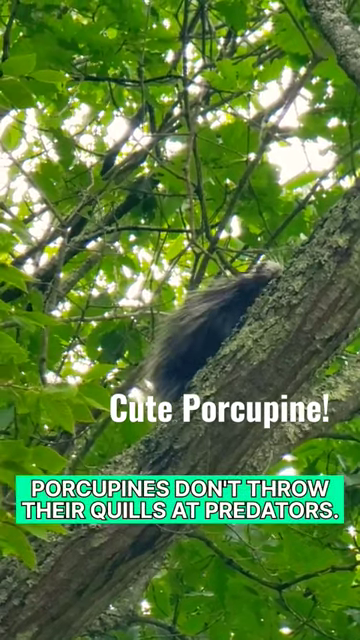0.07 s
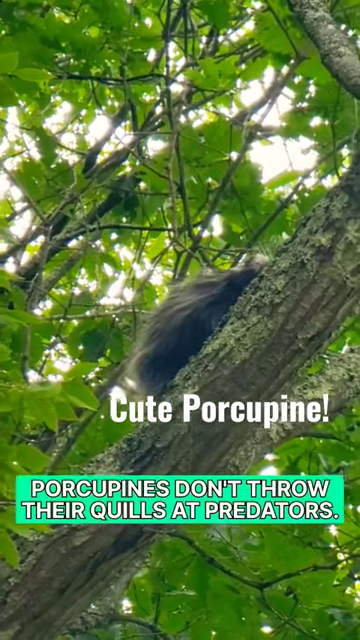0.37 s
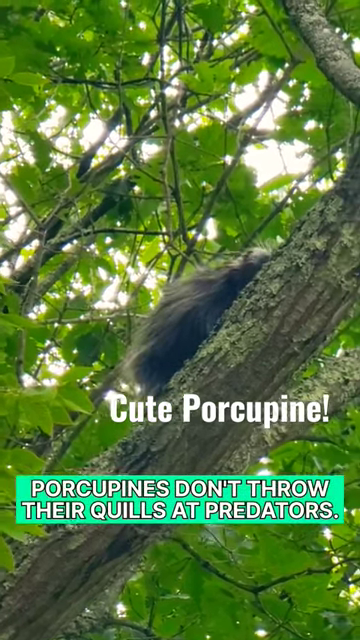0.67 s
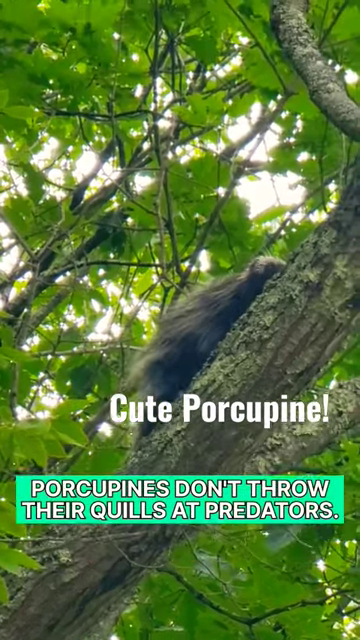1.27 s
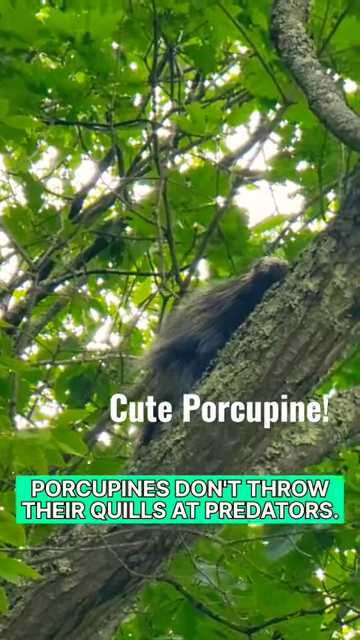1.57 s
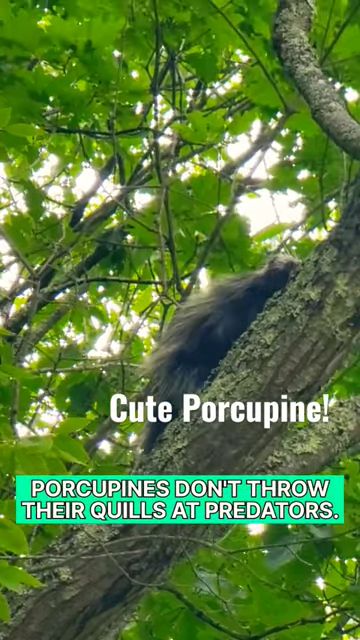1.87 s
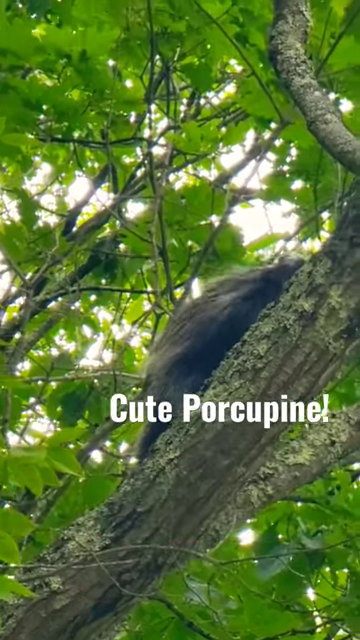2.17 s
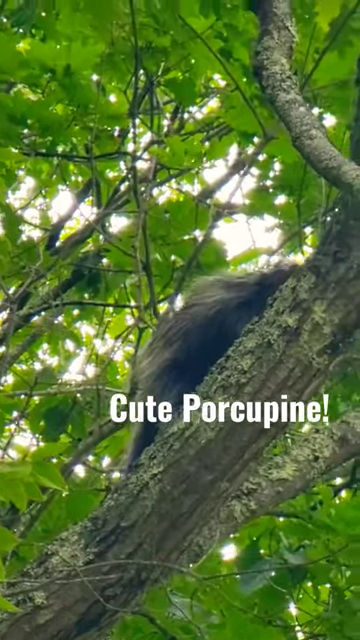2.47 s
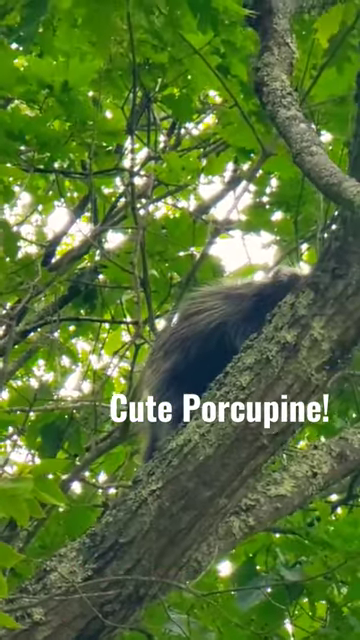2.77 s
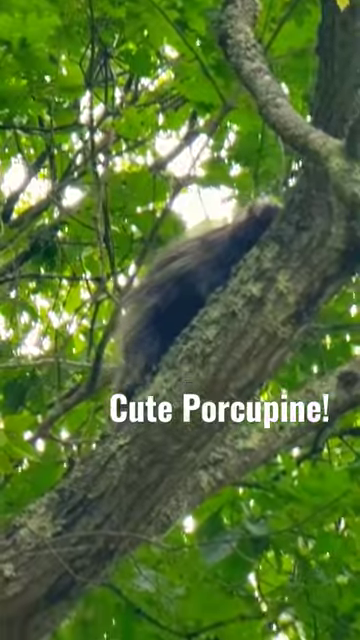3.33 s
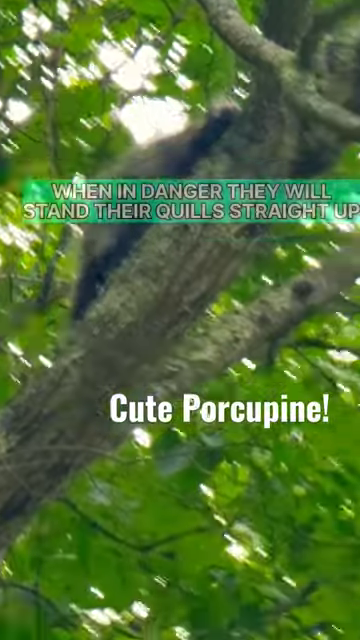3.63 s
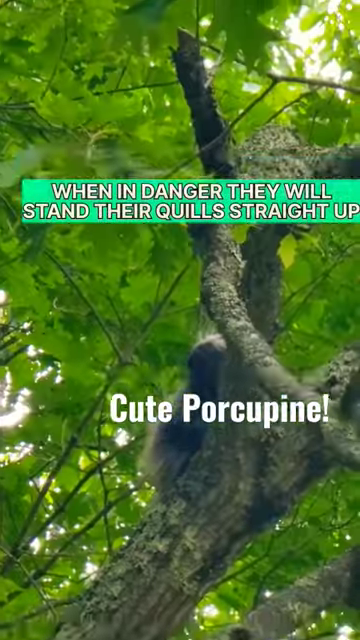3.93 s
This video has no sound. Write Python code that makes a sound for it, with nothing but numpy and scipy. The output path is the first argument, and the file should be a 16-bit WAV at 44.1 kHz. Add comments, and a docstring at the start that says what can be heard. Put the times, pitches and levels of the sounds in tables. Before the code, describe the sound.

Birds sing in the woods, opening with a short falling whistle. From about 0.4 seconds a rapid, high trill swells, stopping at 1.7. A second sliding whistled phrase comes around 2 seconds, then a faint, far whistle dips and rises from 2.5 to 3.8, and a short peep ends it. A distant engine drones underneath throughout, with soft rustles and tiny twig ticks near 1 and 3.7 seconds.

```python
"""Summer woods. A distant engine drones under the hush of the air, with soft rustles and far bird calls.
A bird whistles a sliding phrase, then another swells into a dry trill of quick upward chips, and a
twig ticks. After the trill comes a second whistled phrase, then one long, far whistle that dips and
rises. Another tick and a short peep come last. The trees scatter the birdsong into soft echoes."""
import sys
import numpy as np
from scipy import signal
from scipy.fft import rfft, irfft
from scipy.io import wavfile

SR = 44100
rng = np.random.default_rng(int(sys.argv[2]) if len(sys.argv) > 2 else 0)


def store_wav(level_fs):
    """Save 16-bit WAV to argv[1]."""
    pcm = np.round(np.clip(np.atleast_2d(level_fs), -1, 1) * 32767)
    wavfile.write(sys.argv[1], SR, pcm.T.astype(np.int16))


N = 176400
TIME = np.arange(N) / SR
FAR_FADE_S = 0.72  # time for a far bird's echo to fall by 60 dB


def from_db(db):
    """Turn decibels into a number to multiply by."""
    return 10 ** (np.asarray(db) / 20)


def unit_power(x):
    """Scale a signal so that its average power is 1."""
    return x / np.sqrt(np.mean(x ** 2) + 1e-20)


def in_time(rows):
    """Join rows that start with a time into curves, one for each other column."""
    times, *columns = np.transpose(rows)
    return [np.interp(TIME, times, column) for column in columns]


def at_hz(points, hz):
    """Read a value between frequency points, with every octave equally wide."""
    frequencies, values = np.transpose(points)
    return np.interp(np.log(hz), np.log(frequencies), values)


def drift(rate_hz):
    """A smooth random wobble of size about 1; a higher rate wobbles faster."""
    step, warm_up = 40, 2000
    memory = np.exp(-2 * np.pi * step * rate_hz / SR)
    noise = rng.standard_normal(N // step + warm_up + 2)
    slow = signal.lfilter([1], [1, -2 * memory, memory * memory], noise)[warm_up:]
    return np.interp(np.arange(N) / step, np.arange(len(slow)), unit_power(slow))


def phase_of(hz):
    """The angle a wave has turned through as its pitch moves."""
    return 2 * np.pi * np.cumsum(hz) / SR


def pan(left_db):
    """Left and right gains that make the left ear louder by left_db."""
    return from_db(np.array([[left_db], [-left_db]]) / 2)


def place(x, left_db, lag_ms):
    """Put a sound to one side: the ears differ in level, and the left hears it later."""
    hz = np.arange(N // 2 + 1) * SR / N
    late = irfft(rfft(x) * np.exp(-2j * np.pi * hz * lag_ms / 1000), N)
    return np.array([late, x]) * pan(left_db)


def woods(x, echo_db, fade_s):
    """Echoes from near branches and far trunks, different in each ear; far ones fall 60 dB in fade_s."""
    near_share, near_fade_s, build_s = 0.64, 0.058, 0.0079
    t = TIME[:SR]
    far = unit_power(from_db(-60 * t / fade_s))
    near = unit_power(from_db(-60 * t / near_fade_s))
    shape = np.sqrt((1 - near_share) * far ** 2 + near_share * near ** 2) * (1 - np.exp(-t / build_s))
    echoes = unit_power(rng.standard_normal((2, SR)) * shape) / np.sqrt(SR)
    return from_db(echo_db) * signal.fftconvolve(x[None], echoes, axes=1)[:, :N]


def twigs(x, echo_db=-11, peak_s=0.0028):
    """Twigs around a perch bounce a note back a few milliseconds late, which thickens it."""
    t = TIME[:SR // 20]
    echoes = unit_power(rng.standard_normal((2, len(t))) * t * np.exp(-t / peak_s)) / np.sqrt(len(t))
    return from_db(echo_db) * signal.fftconvolve(x[None], echoes, axes=1)[:, :N]


def banded_noise(spectrum, flicker_db):
    """Stereo noise in bands half an octave wide, each flickering on its own."""
    # how alike the two ears are: frequency_hz, likeness (1 = the same, 0 = unrelated)
    ear_likeness = [(40, 0.96), (130, 0.68), (300, 0.62), (700, 0.38), (1300, -0.18), (3000, 0.073),
                    (10000, 0.00048)]
    out, edges_hz = 0, np.geomspace(22, 17000, 21)
    white = rng.standard_normal((2, 2, N))
    for k, (low, high) in enumerate(zip(edges_hz, edges_hz[1:])):
        band = signal.butter(2, [low, high], "band", fs=SR, output="sos")
        shared, opposite = signal.sosfilt(band, white[k % 2])
        hz = np.sqrt(low * high)
        alike = at_hz(ear_likeness, hz)
        stereo = np.sqrt(1 + alike) * shared + np.sqrt(1 - alike) * opposite * [[1], [-1]]
        out += from_db(at_hz(spectrum, hz) + flicker_db * drift(31)) * stereo
    return unit_power(out)


def air(level_db=-59):
    """A steady low rumble and the hush of the woods."""
    # the tone of still air: frequency_hz, level_db
    spectrum = [(25, 4), (40, 8), (70, 15), (110, 12), (160, 1), (300, -1), (450, -1.5), (750, 0),
                (1100, -3.5), (1600, -12.5), (2100, -18), (2600, -13.5), (4200, -16), (5500, -26.5),
                (7500, -26), (10000, -37.5), (12500, -24), (15500, -24)]
    return from_db(level_db) * banded_noise(spectrum, flicker_db=2) * pan(left_db=-1.4)


def engine(gain_db=-0.56, waver_db=2, firings_per_cycle=8):
    """A far exhaust: the firings make one strong tone, and weaker tones around it make it throb."""
    # the firing tone: time_s, pitch_hz
    pitch_curve = [(0.0, 117.5), (0.56, 117), (0.67, 115.5), (2.47, 115.5), (2.68, 118), (3.35, 115.5),
                   (3.44, 117), (3.91, 116.5), (4.0, 130)]
    # how the drone swells and sinks: time_s, level_db
    level_curve = [(0.0, -52), (0.23, -45.5), (0.26, -53), (0.42, -44.5), (0.48, -53), (0.57, -46),
                   (1.48, -49.5), (1.56, -52.5), (1.59, -47), (2.34, -65.5), (2.94, -51.5), (3.66, -51),
                   (3.92, -55.5), (4.0, -64.5)]
    # the engine's tones: waves_per_cycle, level_db
    tones = [(3, -18), (4, -16.5), (5, -19.5), (6, -19), (7, -16), (8, 0), (9, -14.5), (15, -30.5)]
    (hz,), (db,) = in_time(pitch_curve), in_time(level_curve)
    cycle, swell_db = phase_of(hz / firings_per_cycle), db - db.mean()
    out = 0
    for multiple, tone_db in tones:
        weak = multiple != firings_per_cycle  # weak tones swell less and wander out of step
        level_db = db.mean() + swell_db * (0.79 if weak else 1) + tone_db
        phase = multiple * cycle + rng.uniform(0, 2 * np.pi) + weak * 0.33 * drift(2.95)
        out += np.sqrt(2) * from_db(gain_db + level_db + waver_db * drift(1.35)) * np.sin(phase)
    return place(out, left_db=-2.5, lag_ms=0.25)


def rustles():
    """Something rustles close by in brief swells of soft, bright noise."""
    # each rustle: middle_s, width_s, level_db
    swells = [(0.248, 0.11, -64), (.82, 0.24, -72.5), (2.78, 0.22, -78), (3.47, 0.1, -73.5),
              (3.768, 0.13, -73)]
    # the tone of the rustling: frequency_hz, level_db
    spectrum = [(300, -11), (1500, -59), (2700, 1.5), (5000, 0), (7500, -5.5), (10000, -20), (15000, -8.5)]
    loudness = sum(from_db(db) * np.exp(-((TIME - s) / width) ** 2) for s, width, db in swells)
    return loudness * banded_noise(spectrum, flicker_db=4)


def ticks(decay_s=0.002, band_hz=(5100, 8500), crack_db=-13):
    """Tiny twig snaps: bright noise with a broad crack on top, dying at once."""
    # each snap: start_s, level_db
    snaps = [(1.0592, -55.5), (3.731, -60)]
    bursts = sum(from_db(db) * (TIME >= s) * np.exp(-np.abs(TIME - s) / decay_s) for s, db in snaps)
    band = signal.butter(2, band_hz, "band", fs=SR, output="sos")
    bright = unit_power(signal.sosfilt(band, rng.standard_normal(N)))
    crack = from_db(crack_db) * rng.standard_normal(N)
    sound = bursts * (bright + crack)
    return sound + woods(sound, echo_db=-8, fade_s=0.3)


def far_birds(gain_db=-0.5, buzz_rate_hz=130, uneven=0.35):
    """Short sliding calls, half lost in the trees; a fast, uneven shake in pitch makes them buzz."""
    # each call: start_s, length_s, first_hz, last_hz, level_db, buzz_depth_hz
    calls = [(0, 0.024, 4090, 4220, -66, 64.8), (0.101, 0.033, 4140, 4050, -66, 60),
             (0.107, 0.3, 6740, 7240, -74, 890), (.115, 0.03, 2500, 1990, -61.5, 124),
             (1.348, 0.063, 2200, 1750, -60.5, 79), (1.748, 0.064, 4625, 4606, -55, 118),
             (1.8, 0.054, 3660, 3560, -67, 130), (1.916, 0.058, 4350, 3800, -60.5, 179),
             (1.972, 0.095, 3990, 4575, -63, 356.4), (1.965, .12, 5000, 5090, -68.5, 185),
             (2.05, 0.082, 2976, 2967, -61, 119), (2.158, .16, 7180, 6870, -75.5, 280),
             (2.602, 0.34, 4086, 4395, -72.5, 300), (3.024, 0.038, 4380, 4650, -72.5, 60),
             (3.077, .06, 4850, 4500, -79, 60), (3.365, 0.078, 8360, 8660, -70.5, 830),
             (3.511, 0.049, 4840, 4000, -71, 64.4), (3.924, 0.3, 4057, 4250, -67.5, 54)]
    shake = np.sin(phase_of(buzz_rate_hz * (1 + uneven * drift(40)))) * (1 + uneven * drift(90))
    song = np.zeros(N)
    for start_s, length_s, first_hz, last_hz, db, buzz_depth_hz in calls:
        progress = np.clip((TIME - start_s) / length_s, 0, 1)
        hz = first_hz + (last_hz - first_hz) * progress + buzz_depth_hz * shake
        song += from_db(db + gain_db) * np.sin(np.pi * progress) * np.sin(phase_of(hz))
    return song + woods(song, echo_db=5, fade_s=FAR_FADE_S)


def whistle(curve, quaver_hz=17.5, rasp_hz=60, flutter_db=1, edge_s=0.011):
    """A sliding tone that trembles a little in pitch and level, and rasps where it falls fast."""
    hz, db = in_time(curve)
    falling = np.clip(-np.gradient(hz) * SR / 13000, 0, 1)  # full rasp at a fall of 13000 Hz a second
    hz = hz + quaver_hz * drift(54.7) + rasp_hz * falling * drift(240)
    fade = np.clip(np.minimum(TIME - curve[0][0], curve[-1][0] - TIME) / edge_s, 0, 1)
    return fade * from_db(db + flutter_db * drift(34)) * np.sin(phase_of(hz))


def far_whistler(fading_db=4):
    """A far bird's long note fades in and out, heard only as echoes from the trees."""
    # a note that dips and rises again: time_s, pitch_hz, level_db
    note = [(2.48, 3987, -79), (2.66, 4107, -76), (2.8, 4215, -65.5), (2.9, 4150, -81), (2.97, 3770, -77.5),
            (3.07, 3470, -78.5), (3.15, 3430, -80), (3.21, 3400, -72), (3.31, 3460, -83), (3.48, 3880, -75),
            (3.62, 4010, -78), (3.8, 3930, -84)]
    song = whistle(note, quaver_hz=31.9) * from_db(fading_db * drift(18))
    return woods(song, echo_db=2.5, fade_s=FAR_FADE_S)


def near_whistler(gain_db=0.5):
    """A near bird whistles two sliding phrases; a short, dry peep follows at the end."""
    # one curve for each phrase: time_s, pitch_hz, level_db
    phrases = [
        [(0, 3204, -34), (.012, 3337, -55), (.028, 3370, -48.5), (.037, 3400, -61), (.05, 3418, -48.5),
         (.075, 3443, -49), (.092, 3280, -63), (.11, 3010, -52), (.126, 2842, -53.5), (.134, 2314, -72),
         (.16, 2150, -82), (.21, 2430, -64), (.235, 2450, -56)],
        [(1.935, 3950, -64), (1.962, 3510, -49.5), (1.971, 3280, -68), (1.977, 2976, -55.5), (1.992, 3060, -51),
         (2.046, 3013, -52.5), (2.07, 3058, -65), (2.115, 3133, -56), (2.149, 2880, -54), (2.162, 2490, -57),
         (2.177, 2314, -65), (2.209, 2483, -56), (2.231, 2560, -75), (2.253, 2670, -57.5), (2.275, 2680, -93)],
    ]
    # a peep that rises and falls: time_s, pitch_hz, level_db
    peep_curve = [(3.898, 2780, -58), (3.916, 2940, -54.5), (3.924, 2920, -54), (3.938, 2430, -54)]
    song = from_db(gain_db) * sum(whistle(phrase) for phrase in phrases)
    peep = whistle(peep_curve)
    echoes = twigs(song + peep) + woods(song, echo_db=-3.5, fade_s=0.43)
    return place(song, left_db=0.5, lag_ms=0.08) + peep + echoes


def trill(gain_db=-0.26, quaver_hz=47, jitter_hz=26.6, leaf_cutoff_hz=3950):
    """Each chip is a pure tone that sweeps up, swells and fades; leaves dull its far echo."""
    # each chip of the trill: middle_s, level_db
    chips = [(.364, -69), (.413, -64.5), (0.459, -65.5), (0.505, -62.5), (.552, -59), (0.598, -57.5),
             (.645, -54.5), (.692, -54.5), (.740, -55.5), (.788, -52.5), (0.834, -53.5), (.883, -50),
             (0.932, -57), (.980, -50), (1.026, -49.5), (1.074, -50), (1.121, -49), (1.169, -46),
             (1.217, -49.5), (1.265, -47), (1.313, -47.5), (1.360, -45), (1.41, -48), (1.456, -46),
             (1.508, -45), (1.557, -45.5), (1.606, -46.5), (1.654, -46.5), (1.705, -44)]
    # the centre of the sweeps: time_s, pitch_hz
    pitch_curve = [(.36, 4670), (.65, 4490), (1.15, 4353), (1.7, 4365)]
    # the shape of every chip: from_middle_s, from_centre_hz, level_db
    chip_shape = [(-.017, -950, -28.5), (-.0105, -560, -16.5), (-.0055, -190, -5.5), (0, 29.5, .5),
                  (.004, 161, -4), (.008, 244, -6), (.011, 236, -19), (0.014, 140, -32)]
    shape_s, sweep_hz, swell_db = np.transpose(chip_shape)
    centre_hz = in_time(pitch_curve)[0] + quaver_hz * drift(370)
    song = np.zeros(N)
    for middle_s, db in chips:
        sounding = (TIME > middle_s + shape_s[0]) & (TIME < middle_s + shape_s[-1])
        t = TIME[sounding] - middle_s
        hz = centre_hz[sounding] + jitter_hz * rng.standard_normal() + np.interp(t, shape_s, sweep_hz)
        song[sounding] += from_db(gain_db + db + np.interp(t, shape_s, swell_db)) * np.sin(phase_of(hz))
    dulled = signal.sosfilt(signal.butter(8, leaf_cutoff_hz, fs=SR, output="sos"), song)
    echoes = woods(song, echo_db=-6.3, fade_s=0.66) + woods(dulled, echo_db=8, fade_s=1.0)
    return place(song, left_db=2.5, lag_ms=0.023) + twigs(song) + echoes


def scene():
    """Add the birds to the background."""
    background = air() + engine() + rustles() + ticks()
    return background + far_birds() + far_whistler() + near_whistler() + trill()


def record(dry):
    """Cut away the very highest treble."""
    cutoff_hz = 15500
    hz = np.arange(N // 2 + 1) * SR / N
    return irfft(rfft(dry) * (hz < cutoff_hz), N)


dry = scene()
out = record(dry)
store_wav(out)
```